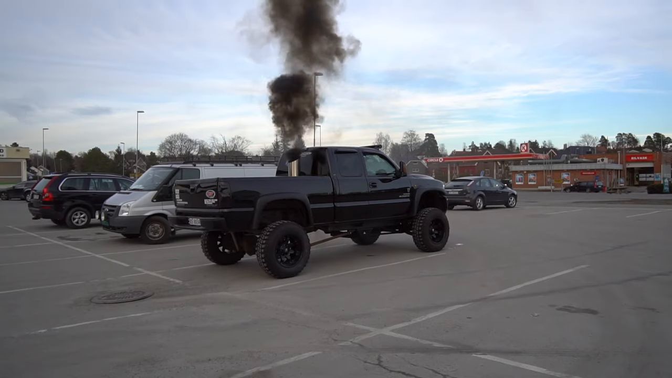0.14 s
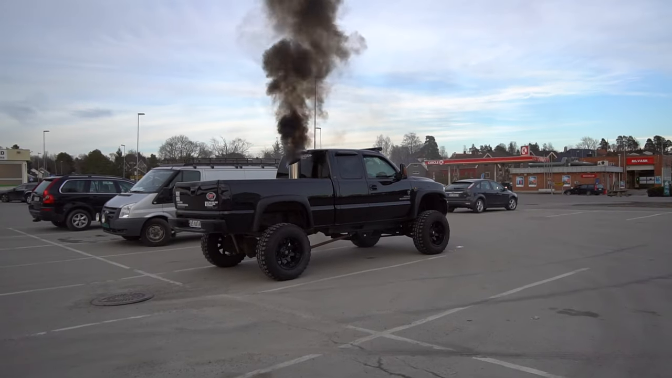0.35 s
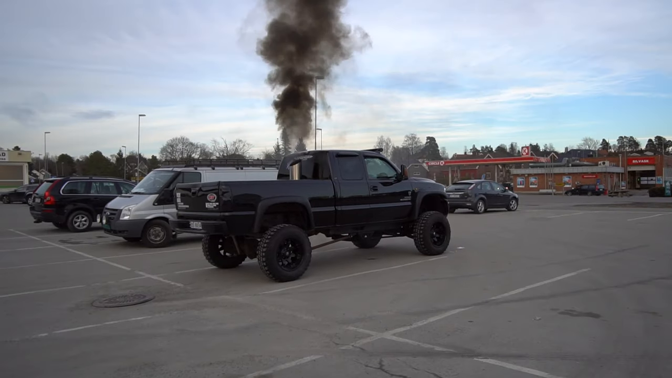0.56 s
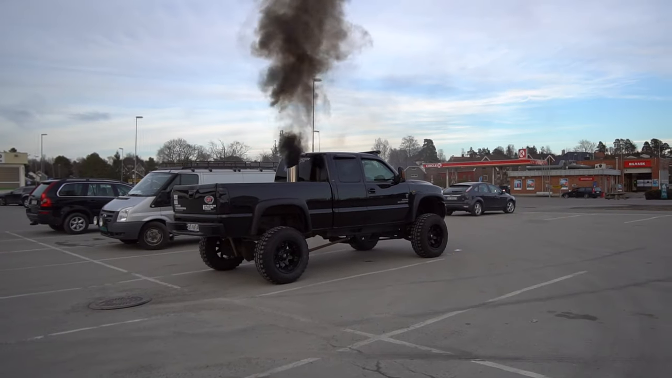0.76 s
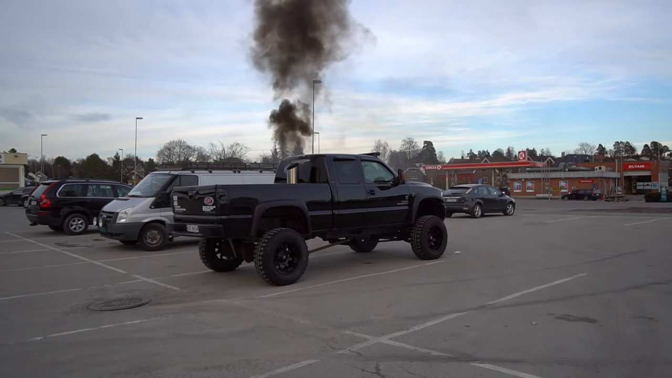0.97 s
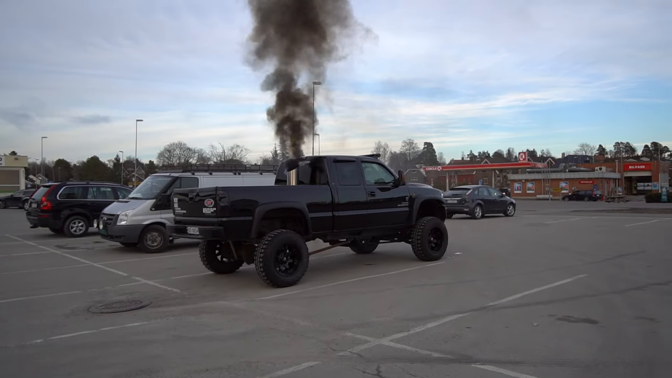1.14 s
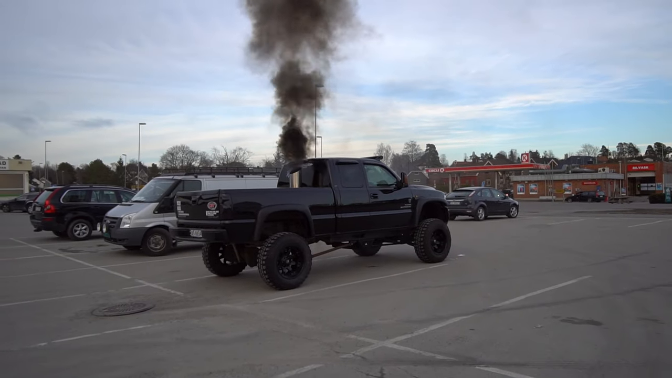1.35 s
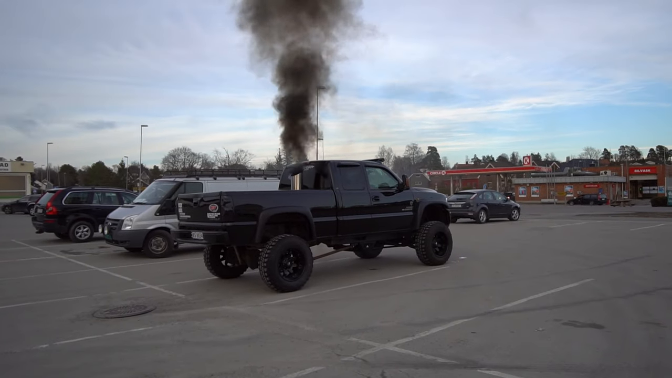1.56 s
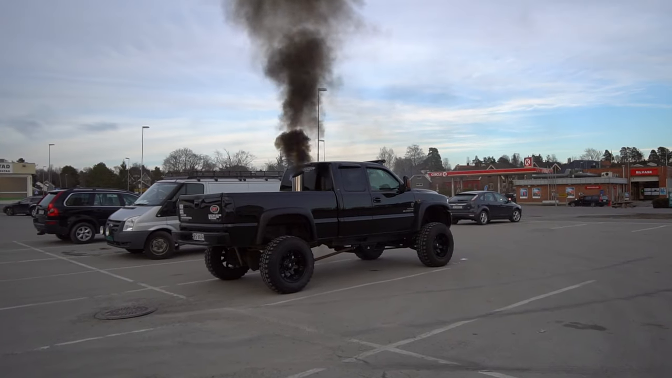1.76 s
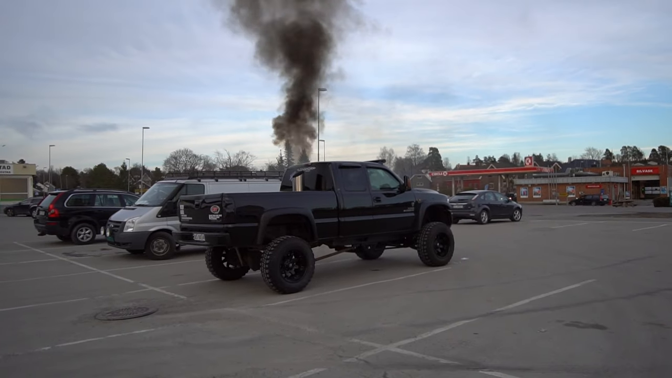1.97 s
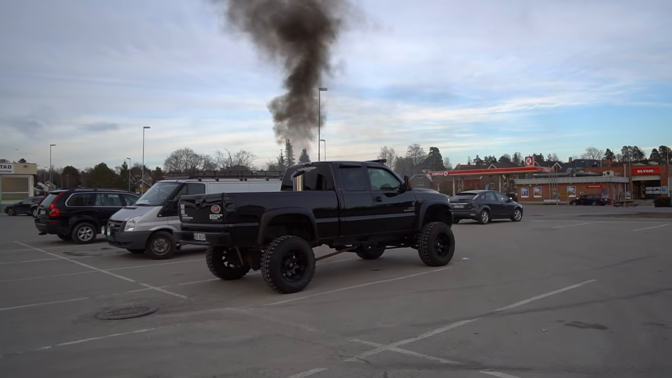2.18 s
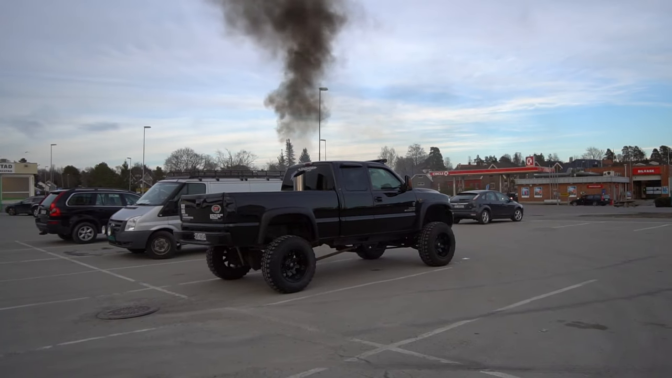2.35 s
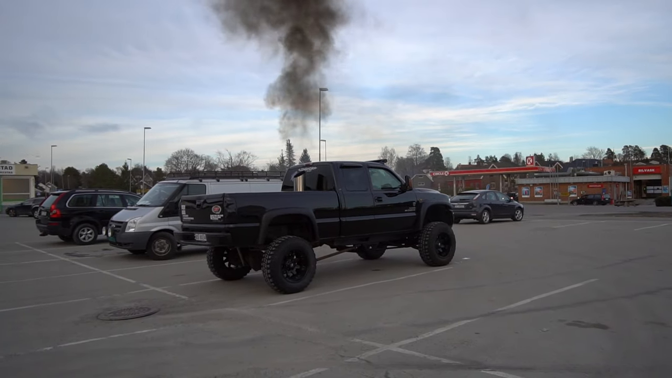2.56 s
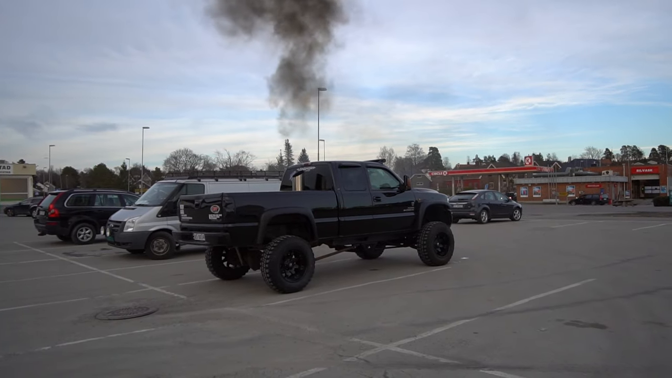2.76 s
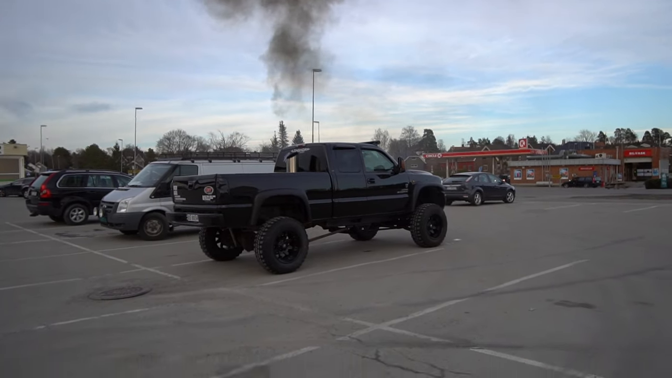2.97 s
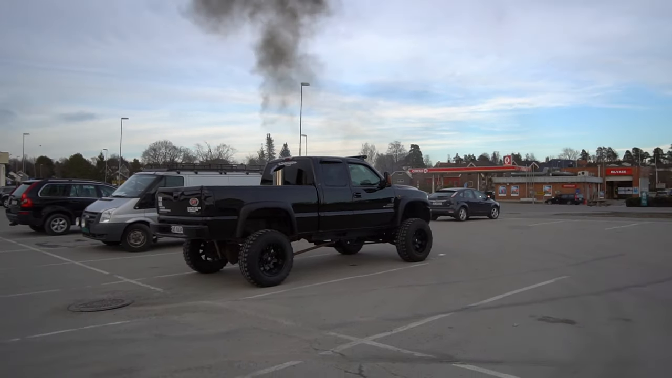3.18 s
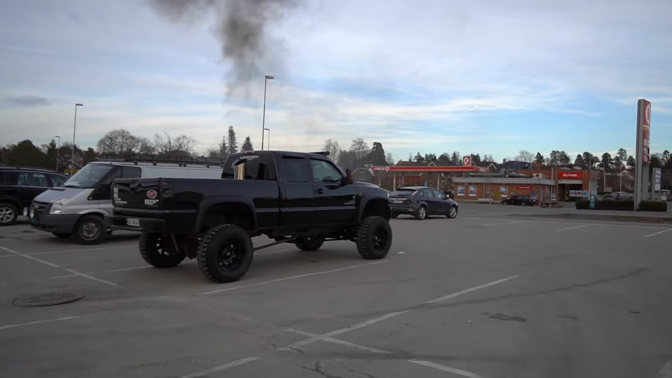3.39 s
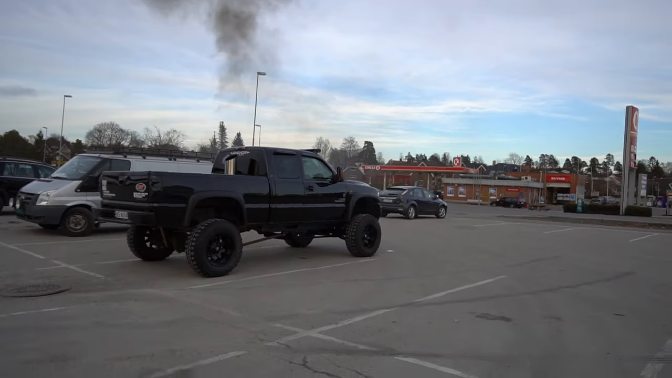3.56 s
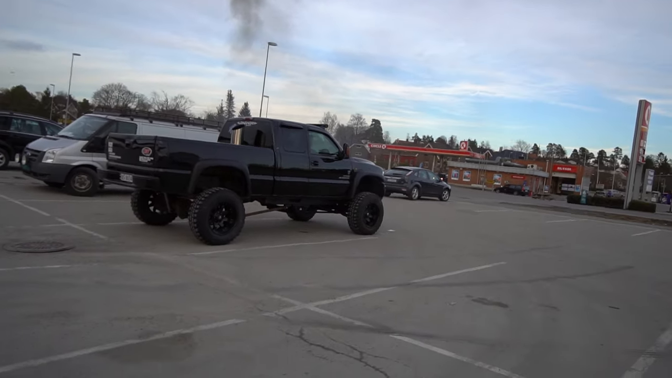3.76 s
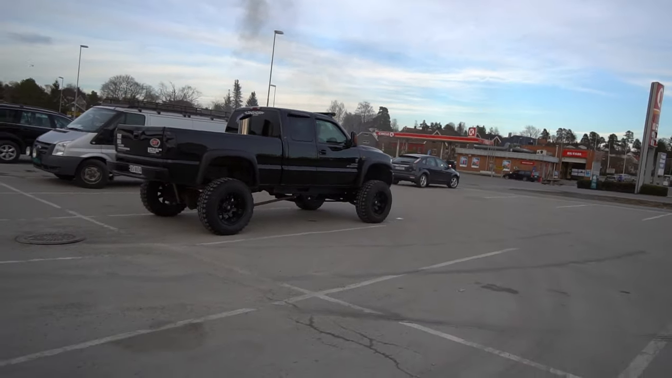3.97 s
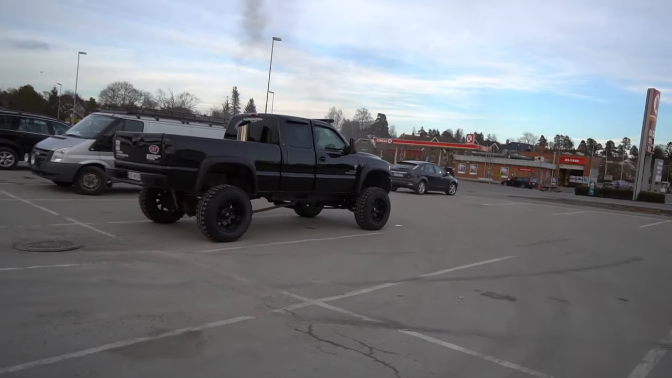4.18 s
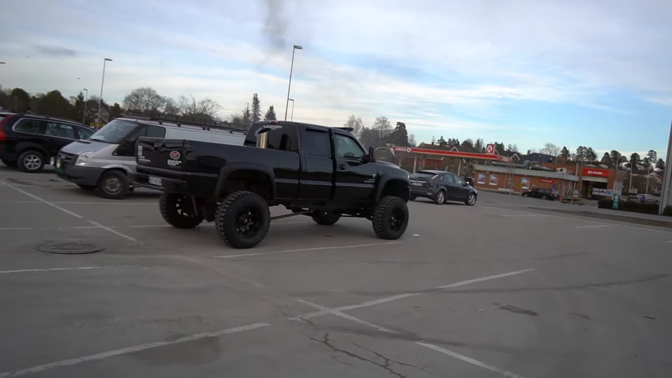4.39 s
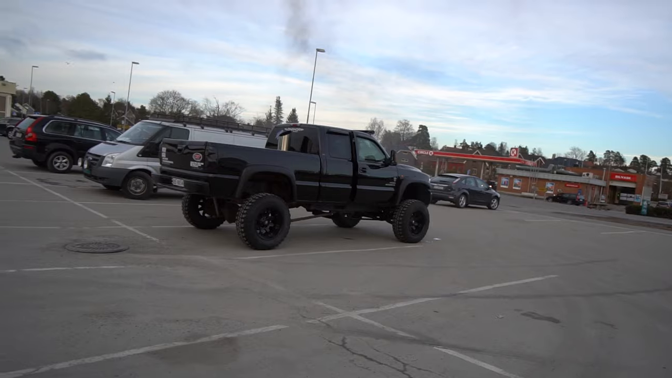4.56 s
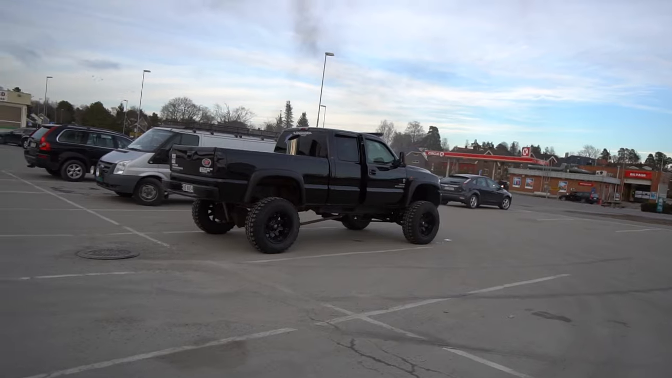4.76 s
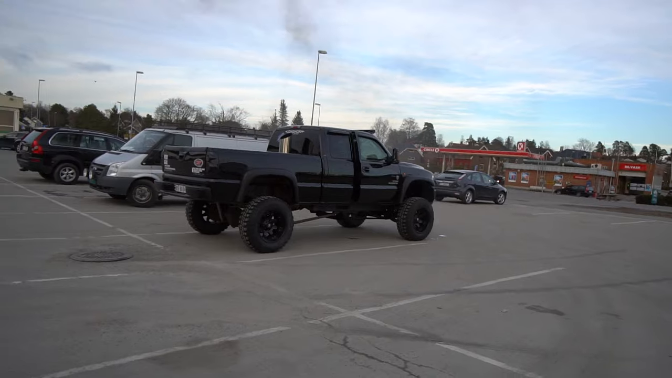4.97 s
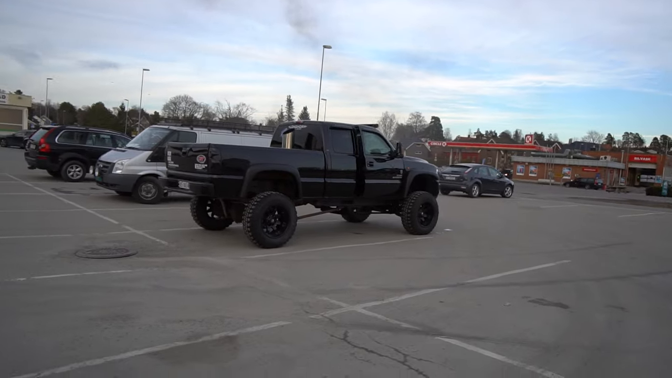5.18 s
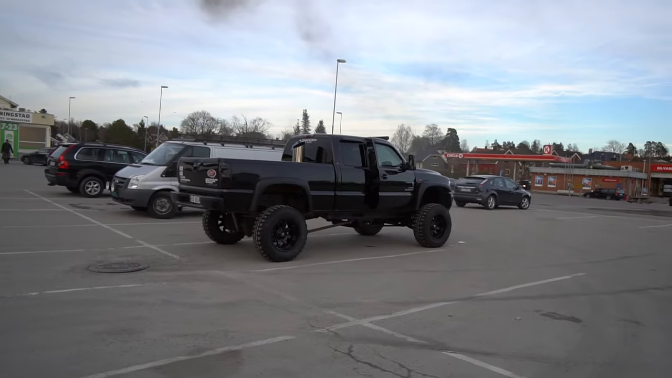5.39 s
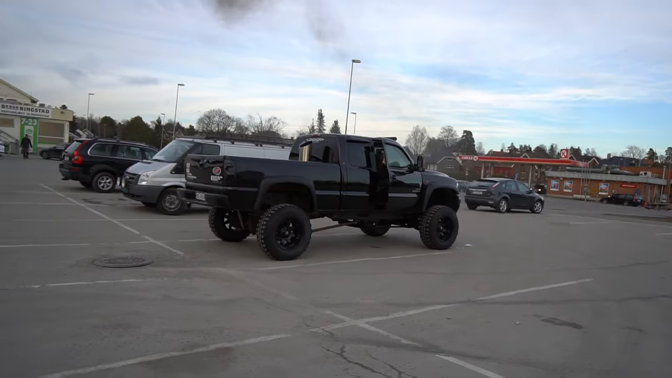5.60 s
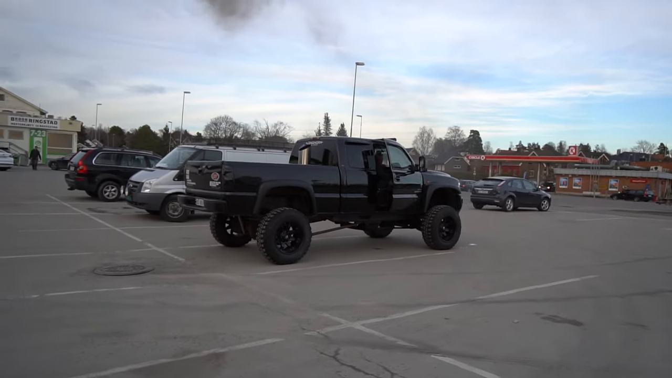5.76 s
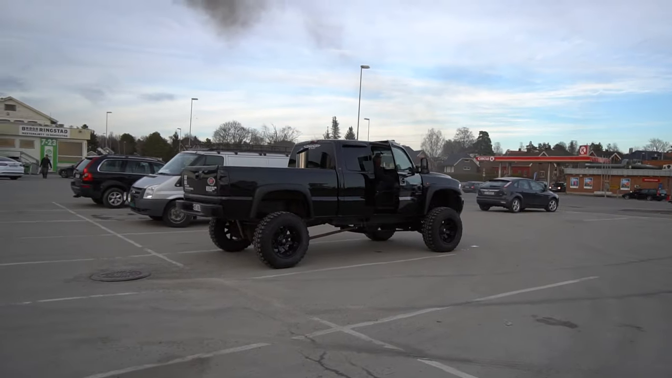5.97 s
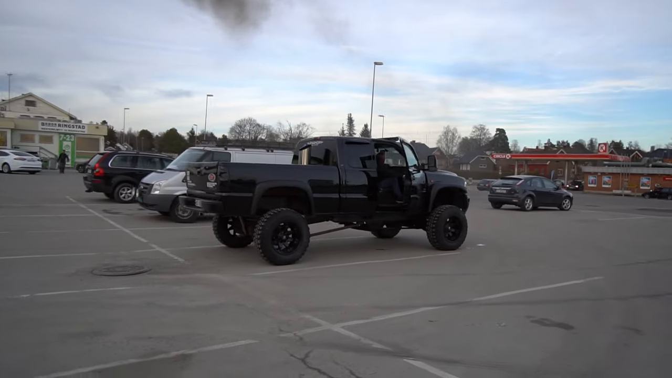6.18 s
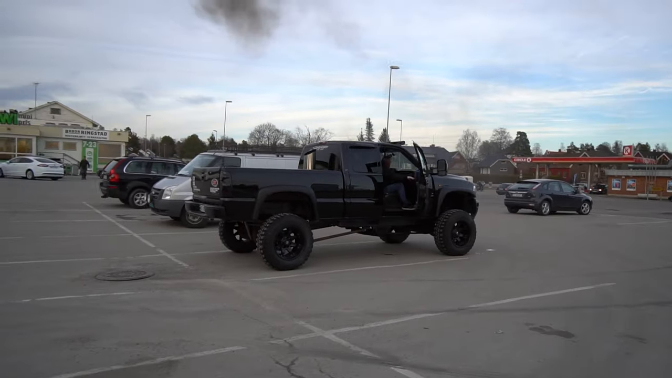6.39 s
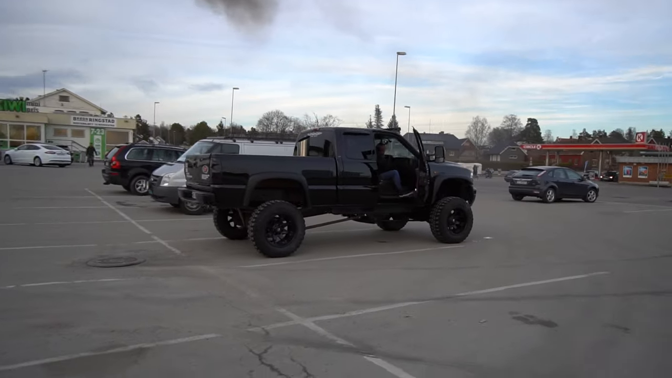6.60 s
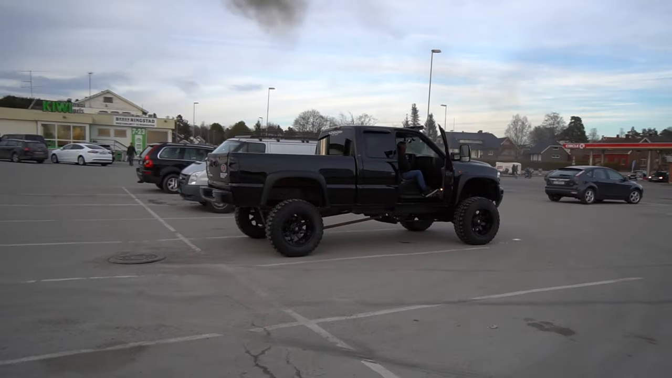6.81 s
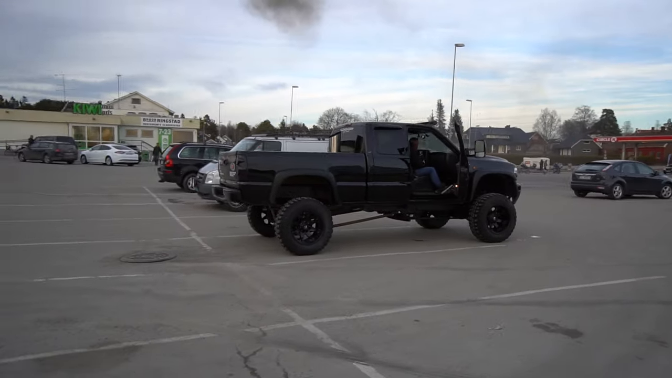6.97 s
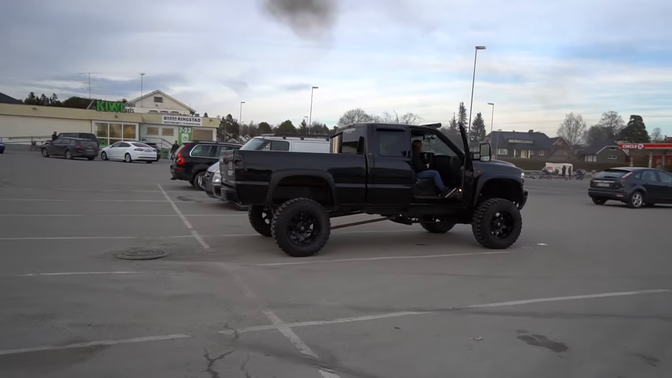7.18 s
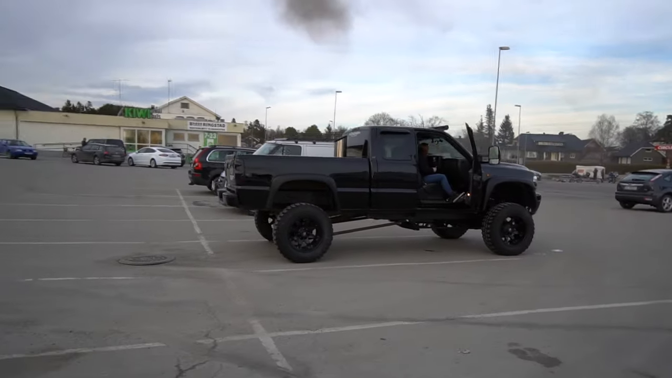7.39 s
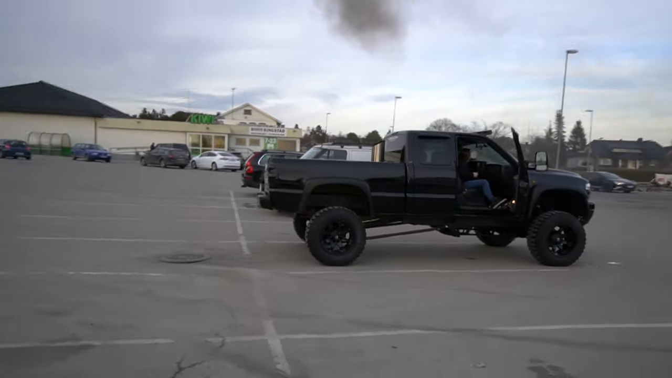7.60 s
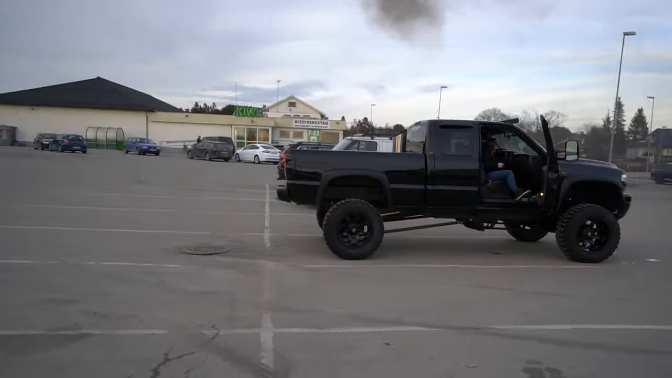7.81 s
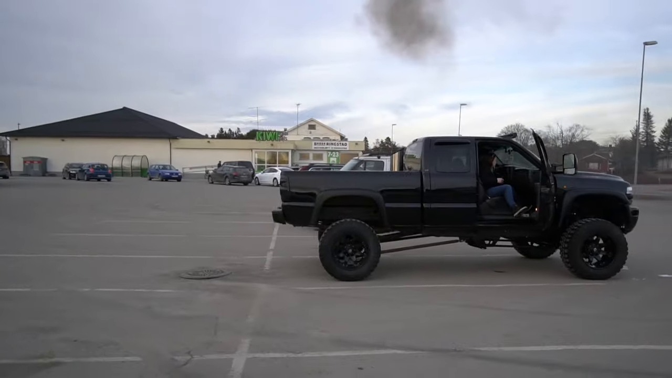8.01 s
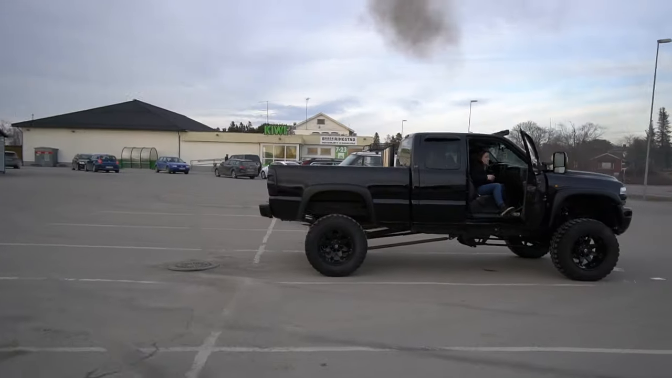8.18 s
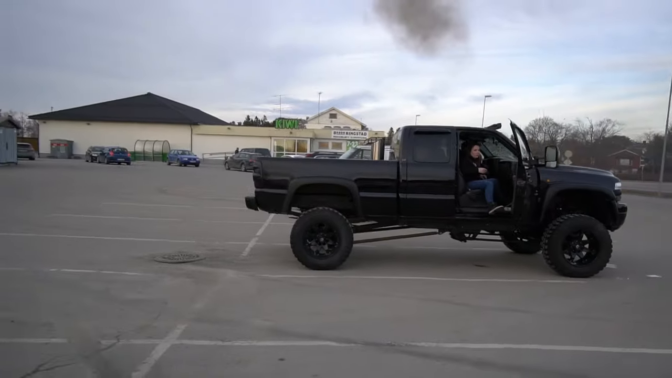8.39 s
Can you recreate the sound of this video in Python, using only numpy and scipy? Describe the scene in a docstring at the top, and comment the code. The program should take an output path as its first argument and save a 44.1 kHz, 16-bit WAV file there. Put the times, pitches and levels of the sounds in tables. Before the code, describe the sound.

A loud diesel engine already spinning down is stabbed four times, each bark raspy and almost overloading a handheld microphone whose level ducks. Pitch slides down for about two seconds with rasp, airy hiss and a faint descending whistle. Then a rhythmic idle throbs steadily, each pulse a low boom with gritty clatter and fine ticking, growing closer. Open-air car park, slight reflections off cars and walls.

```python
"""Revving diesel pickup in a car park

A V8 turbodiesel pickup with an open exhaust stack barks at four stabs of the throttle, then coasts down.
Clicks, noise and sines locked to one crankshaft make the engine; filters shape them like the stack.
The turbo is hiss with a falling whistle. Then the idle surges about three and a half times a second,
growing louder as the truck draws nearer. Thin echoes follow, and the recorder's gain ducks loud passages.
"""
import sys
import numpy as np
from scipy import signal
from scipy.fft import rfft, irfft
from scipy.io import wavfile
from scipy.ndimage import uniform_filter1d, minimum_filter1d, map_coordinates

SR = 44100
rng = np.random.default_rng(int(sys.argv[2]) if len(sys.argv) > 2 else 0)


def wrap_up_sound(samples):
    """Save the sound to the file named by the first command line argument, as 16-bit audio."""
    columns = np.atleast_2d(samples).T
    # keep every value between -1 and 1, then stretch to whole-number steps
    tamed = np.clip(columns, -1, 1)
    steps = np.round(tamed * 32767).astype(np.int16)
    wavfile.write(sys.argv[1], SR, steps)


N = 372644
TIME = np.arange(N) / SR

# Levels below are starting points: most layers get a small trim where they are mixed.
# Throttle stabs: start_s, end_s, top_speed_turns_per_s, spin_up_s, run_down_s, strength_db,
# rip_db (added in part to the strength), drone_after_db, rasp_after_db
STABS = [(0.05, 0.172, 57, .045, 2.62, -7, -7, -16, -21),
         (.592, 0.669, 52.1, 0.01614, 3.3, -9.5, -7.5, -16, -23),
         (1.033, 1.183, 56.1, .065, 2.6, -8, -7, -18.5, -22.5),
         (1.507, 1.611, 56.8, .024, 2.38, -7, -6.5, -20.5, -23.5)]
# Idle surges: crest_s, boom_db
SURGES = [(3.79, -24.5), (4.017, -18.5), (4.274, -19), (4.576, -19), (4.845, -18.5), (5.128, -18.5),
          (5.422, -16), (5.696, -18), (5.966, -19), (6.25, -15.5), (6.53, -17), (6.811, -18.5),
          (7.093, -18.5), (7.38, -14.5), (7.649, -18), (7.939, -18.5), (8.22, -19.5), (8.5, -15)]
# Exhaust tones under full fuel: multiple_of_crank_speed, level_db
LOAD_ORDERS = [(1.5, -21), (2, -19), (2.5, -24), (3, -26.5), (4, -7.5), (7, -21), (7.5, -30), (8, -4.5),
               (9, -26)]
# Weaker tones of the coasting engine: multiple_of_crank_speed, level_db (against each other)
COAST_ORDERS = [(1, -11), (1.5, 4), (2, -1.5), (2.5, -18), (3.5, -1), (4.5, -21), (5, -5), (5.5, -2),
                (6.5, -7.5), (7, -22.5), (8, -2.5), (8.5, -15), (9, -10), (12, -9.5), (14, -13)]
# Idle tones: multiple_of_crank_speed, level_db (against the boom)
IDLE_ORDERS = [(4, -11), (5, -16), (6, -12), (8, 0.5), (10, -19)]
# Resonances of the stack: centre_hz, width_hz, lift_db
STACK = [(113.2, 43, 18), (227, 22, 2), (335, 38, 7.5), (417.6, 75, 8.5), (585, 126, 6), (1020, 246, 10),
         (1502, 155, 9), (2050, 44, 0.5), (3290, 180, 1)]
# Broad colours of the noisy layers, each: frequency_hz, level_db
BARK = [(60, -28), (190, -8), (300, 1), (480, -1), (750, -11), (1050, -9), (1500, -19), (2400, -32.5),
        (4500, -29), (15000, -78)]
# Bright tearing of a stab: frequency_hz, level_db
RIP = [(400, -28), (800, -6), (1100, -3), (1700, -1), (2400, -7), (3400, -10.5), (4500, -27.5), (6000, -66),
       (15000, -86)]
# Rasp of the coasting engine: frequency_hz, level_db
RASP = [(25, -31), (45, 0.5), (90, -6.5), (200, 4), (400, 1.5), (540, -4.5), (750, -6.5), (1300, -8),
        (2000, -8.5), (3200, -12.5), (4200, -21.5), (5500, -42), (15000, -72)]
# Colour of the coasting tones, strong near 45 Hz and thin below it: frequency_hz, level_db
MOUTH = [(20, -39), (45, 6), (90, -5), (170, 3), (260, 1.5), (340, -3), (500, -5), (900, -7.5)]
# Bark at idle: frequency_hz, level_db
IDLE_BARK = [(80, -2), (160, -12), (260, 0.5), (400, 1.5), (650, -2.5), (900, -8.5), (1500, -25),
             (2500, -29), (6000, -52), (15000, -63)]
# Low rumble: frequency_hz, level_db
RUMBLE = [(20, -59), (33, -6), (46, -0.5), (70, 1.5), (90, -0.5), (135, 1), (190, -12.5), (400, -14.5),
          (2000, -82)]
# Steady exhaust flow at idle: frequency_hz, level_db
FLOW = [(25, -33.5), (45, 2.5), (70, -0.5), (105, 3.5), (155, 0.5), (230, -15.5), (400, -17), (2000, -63)]
# Combustion clatter: frequency_hz, level_db
CLATTER = [(150, 6.5), (400, -2.5), (800, -1.5), (1100, 2.5), (1400, 5), (1900, -2), (2500, -1.5),
           (3400, -7.5), (4300, -14.5), (5300, -26), (7000, -32), (9500, -40), (15000, -50)]
# Hiss of the turbo and of the idle's spit: frequency_hz, level_db
HISS = [(1500, -15), (4000, 7.5), (6300, 6), (8000, 0.5), (9800, -3), (11500, -1), (15500, -5)]
# Fine ticking at idle: frequency_hz, level_db
TICKS = [(4000, -16), (8000, -4.5), (11500, 7), (15500, 3)]
# Cylinders in firing order: strength_db
CYLINDERS = [1.5, -14.5, -8.5, -2.5, 2, 0, -3, -9.5]
# Light metal clinks: start_s, pitch_hz, level_db
CLINKS = [(3.75, 2500, -40), (3.901, 2600, -38), (6.77, 5030, -50), (7.02, 4050, -45), (8.15, 4090, -48),
          (7.552, 3834, -44), (7.552, 2561, -33)]
# Echoes off parked cars and shop fronts: delay_s, level_db
ECHOES = [(.0063, -16.5), (0.03, -14), (0.075, -31), (0.126, -23.5), (.27, -22.5)]

# Already coasting before the first stab (turns per s, dB)
FIRST_SPEED, FIRST_DRONE_DB, FIRST_RASP_DB = 48.0, -11, -18.5
PULL_LEAD_S, OVERRUN_S = 0.012, 0.025   # driven from just before a bark, held at speed just after it
DRY_FRICTION_SPEED = 23.0   # turns per s at which viscous drag equals dry friction
GUST_DB, GUST_S, GUST_EDGE_S = 4, 0.072, 0.019   # flow swells around a stab, then gives way to the bark
# Third-order drone: turns per s, and dB lost per turn per s under that; then the same for the firing note
DRONE_FADES_BELOW, DRONE_FADE_DB = 33.3, 2.5
FIRING_DB, FIRING_FADES_BELOW, FIRING_FADE_DB = -29, 21.7, 1.1
LINGER_DB, LINGER_S = -15.5, 0.06   # the firing note hangs on after a bark
# As the turbo runs down; its time constant starts once the last stab ends
TURBO_TOP_HZ, TURBO_RUN_DOWN_S = 14100, 1.86
RASP_FALL_DB_PER_S, HISS_FALL_DB_PER_S, WHISTLE_FALL_DB_PER_S = 6.5, 9, 3
TURBO_HISS_DB, HISS_DIP_DB = -22.5, 2.5   # against the gas flow; thinning under each bark
WHISTLE_DB, WHISTLE_END_S = -73, 3.7
DUCT_HZ, DUCT_WIDTH_HZ, DUCT_LIFT_DB = 6444, 550, 11   # the whistle flares as it passes this resonance
IDLE_FROM_S, IDLE_FULL_S = 3.56, 3.74
SURGE_HOLD_S = 0.007   # full fuel just ahead of each crest
CREST_SPEED, SPEED_PER_BOOM_DB = 14.4, 0.15   # turns per s; turns per s lost per dB the boom sinks
# Idle layers: dB when the idle sets in, dB gained per s as the truck draws nearer
BARK_LEVEL, CLATTER_LEVEL, SPIT_LEVEL = (-32.5, 2.34), (-45, 1.58), (-67, 2.98)
BARK_FULL_BOOM_DB, BARK_FOLLOWS = -22.5, 1   # surges booming less than this bark less, by this share
TICKS_PER_S, TICK_DB = 70, 21.5   # sharp lone ticks: average rate, lift over the fine ticking
HUM_START_S, HUM_SINKS_S, HUM_END_S, HUM_FADE_S = 7.24, 7.38, 7.59, 0.028
HUM_HZ, HUM_SAG_HZ_PER_S, HUM_DB = 225, 260, -31.5
CUTOFF_HZ = 15500


def barking(turns):
    """Under full fuel, pressure pulses bark out of the stack and steepen into a rip; low tones linger."""
    clicks = firings(turns, uneven_db=4.0, jitter_s=0.00008)
    blows = clicks + 0.7 * puffs(clicks, decay_s=0.004, steady=0.6)
    bark = colour(blows, BARK, STACK) * throttle(rise_s=0.006, fall_s=0.02)
    tearing = clicks + 1.05 * puffs(clicks, decay_s=0.006, steady=0.7)
    flicker = from_db(drift(58.5))
    rip = colour(tearing, RIP, STACK) * flicker * throttle(rise_s=0.019, fall_s=0.026, rip=0.59)
    boom = tones(turns, LOAD_ORDERS, rough=0.15) * throttle(rise_s=0.072, fall_s=0.024, late_s=0.018)
    return from_db(-2.5) * bark + from_db(-3.0) * rip + from_db(2) * boom


def coasting(speed, turns, drone_db, flow_db):
    """With the fuel cut the engine pumps air: a hollow drone and a rasp through the stack."""
    third_db = drone_db - DRONE_FADE_DB * np.maximum(DRONE_FADES_BELOW - speed, 0)
    firing = from_db(FIRING_DB - FIRING_FADE_DB * np.maximum(FIRING_FADES_BELOW - speed, 0))
    firing += from_db(LINGER_DB) * throttle(rise_s=0.034, fall_s=0.045, late_s=LINGER_S)
    drone = from_db(third_db) * tones(turns, [(3, 0)], rough=0.065)
    drone += firing * tones(turns, [(4, 0.0012)], rough=0.12)

    rasp_db = flow_db - RASP_FALL_DB_PER_S * run_down_time()
    overtones = tones(turns, COAST_ORDERS, rough=0.3)
    drone += from_db(rasp_db - 1.5) * colour(overtones, MOUTH, STACK)
    clicks = firings(turns, uneven_db=2.0, jitter_s=0.00016)
    rasp = colour(0.18 * clicks + puffs(clicks, decay_s=0.0095, steady=1.66), RASP, STACK)
    # the drone gives way while the throttle is open
    shut = np.clip(1 - 1.95 * throttle(rise_s=0.0031, fall_s=0.009), 0, 1)
    return shut * drone + from_db(rasp_db + 1.4) * rasp


def stack_drone(speed, turns, width_hz=36):
    """The fifth order swells as the slowing engine carries it through the stack's lowest resonance."""
    off_tune = 2 * (5 * speed - STACK[0][0]) / width_hz
    return tones(turns, [(5, -35)], rough=0.17) / np.sqrt(1 + off_tune ** 2)


def idling(turns, boom_swing_db):
    """Each surge swells in clatter and bark, and the stack booms at twice the firing rate."""
    crest_s, crest_boom_db = np.transpose(SURGES)
    boom_db = np.interp(TIME, crest_s, crest_boom_db)
    bark_db, clatter_db, spit_db = nearing(BARK_LEVEL), nearing(CLATTER_LEVEL), nearing(SPIT_LEVEL)
    bark_swing_db = surge_swing(attack_db_per_s=219, release_db_per_s=179, depth_db=13.5)
    bark_swing_db += BARK_FOLLOWS * np.minimum(boom_db - BARK_FULL_BOOM_DB, 0)
    clatter_swing_db = surge_swing(attack_db_per_s=47, release_db_per_s=110, depth_db=6.0)
    clicks = firings(turns, uneven_db=4.5, jitter_s=0.00038)

    booming = tones(turns, IDLE_ORDERS, rough=0.2)
    boom = from_db(boom_db + boom_swing_db + 2.7) * booming
    thuds = clicks + 0.69 * puffs(clicks, decay_s=0.0067, steady=0.85)
    rumble = from_db(boom_db + 0.35 * boom_swing_db - 12.0) * colour(thuds, RUMBLE, STACK)
    flow = from_db(bark_db - 3.5) * colour(rng.standard_normal(N), FLOW)

    # gas leaves on each outward swing of the boom
    jet = (np.maximum(booming, 0) + 0.76) * rng.standard_normal(N)
    bark_source = 0.21 * clicks + rms_one(jet)
    bark = from_db(bark_db + bark_swing_db + 0.5) * colour(bark_source, IDLE_BARK, STACK)

    clatter_gain = from_db(clatter_db + clatter_swing_db + 9.0 + 0.51 * drift(45))
    clatter = clatter_gain * colour(puffs(clicks, decay_s=0.021, steady=1.03), CLATTER)
    spit_gain = from_db(spit_db + 0.4 * clatter_swing_db - 0.4)
    spit = spit_gain * colour(puffs(clicks, decay_s=0.017, steady=1.1), HISS)

    grain_db = 4 * np.clip(drift(90), -2, 2.5) + 3 * np.clip(drift(700), -2, 2.5)
    grains = from_db(grain_db) * rng.standard_normal(N)
    lone_ticks = (rng.random(N) < TICKS_PER_S / SR) * rng.uniform(-2, 2, N)
    grains += from_db(TICK_DB) * lone_ticks
    ticking = from_db(spit_db + 0.5 * clatter_swing_db - 9.0) * colour(grains, TICKS)
    return boom + rumble + flow + bark + clatter + spit + ticking


def turbo(revving, flow_db):
    """Air rushes through the spinning turbo; its blades whistle lower, fitfully, as it runs down."""
    since = run_down_time()
    hz = TURBO_TOP_HZ * np.exp(-since / TURBO_RUN_DOWN_S)
    duct_db = DUCT_LIFT_DB / (1 + (2 * (hz - DUCT_HZ) / DUCT_WIDTH_HZ) ** 2)
    whistle_db = WHISTLE_DB - WHISTLE_FALL_DB_PER_S * since + duct_db
    phase = 2 * np.pi * np.cumsum(hz) / SR
    whistle = drift(110) * np.sin(phase) + drift(110) * np.cos(phase)
    audible = np.clip(np.minimum(since, WHISTLE_END_S - TIME) / 0.2, 0, 1)

    dip_db = HISS_DIP_DB * np.clip(2 * throttle(rise_s=0.02, fall_s=0.012, late_s=0.012), 0, 1)
    hiss_db = flow_db + TURBO_HISS_DB - dip_db - HISS_FALL_DB_PER_S * since + 0.5 * drift(64)
    hiss = from_db(hiss_db) * colour(rng.standard_normal(N), HISS)
    return revving * hiss + audible * from_db(whistle_db + 3.5 * drift(14)) * whistle


def small_sounds(clink_decay_s=0.012, clink_width_hz=700):
    """A faint hum that holds, then sinks; and short clinks, each noise rung twice through a narrow filter."""
    hz = HUM_HZ - HUM_SAG_HZ_PER_S * np.maximum(TIME - HUM_SINKS_S, 0)
    sounding = np.clip(np.minimum(TIME - HUM_START_S, HUM_END_S - TIME) / HUM_FADE_S, 0, 1)
    out = from_db(HUM_DB) * sounding * np.sin(2 * np.pi * np.cumsum(hz) / SR)
    for start, pitch, db in CLINKS:
        peak = signal.iirpeak(pitch, pitch / clink_width_hz, fs=SR)
        once = signal.lfilter(*peak, rng.standard_normal(N))
        ring = rms_one(signal.lfilter(*peak, once))
        decay = (TIME > start) * np.exp(-np.abs(TIME - start) / clink_decay_s)
        out = out + from_db(db) * ring * decay
    return out


def car_park(x, echo_low_hz=480, echo_cut_hz=3500):
    """A few thin, dull echoes in the open air: delayed, band-limited copies."""
    band = signal.butter(2, [echo_low_hz, echo_cut_hz], "band", fs=SR, output="sos")
    dull = signal.sosfilt(band, x)
    return x + sum(from_db(db) * np.interp(TIME - delay, TIME, dull, left=0) for delay, db in ECHOES)


def background_rumble():
    """Steady low noise under everything."""
    return from_db(-35) * colour(rng.standard_normal(N), RUMBLE)


def revving_speed():
    """Turns per second: each stab pulls the crank up to its top speed, then friction runs it down."""
    def coast(top, since_s, run_down_s):
        decay = np.exp(-np.maximum(TIME - since_s, 0) / run_down_s)
        return (top + DRY_FRICTION_SPEED) * decay - DRY_FRICTION_SPEED

    speed = coast(FIRST_SPEED, 0, STABS[0][4])
    for start, end, top, spin_up_s, run_down_s, *_ in STABS:
        driven_s = np.clip(TIME - start + PULL_LEAD_S, 0, end - start + PULL_LEAD_S)
        pull = 1 - np.exp(-driven_s / spin_up_s)
        speed = speed + pull / pull[-1] * (coast(top, end + OVERRUN_S, run_down_s) - speed)
    return speed


def throttle(rise_s, fall_s, rip=0, late_s=0):
    """Each stab opens quickly and dies away after the pedal lifts; a higher rip share opens later."""
    t = TIME - late_s
    total = 0
    for start, end, _, _, _, db, rip_db, _, _ in STABS:
        opening = np.clip((t - start) / rise_s + (1 - rip) / 2, 0, 1)
        closing = np.exp(-np.maximum(t - end, 0) / fall_s)
        total = total + from_db(db + rip * rip_db) * opening * closing
    return total


def after_stabs():
    """Drone and gas flow levels (dB) left by each stab; the flow swells just before and just after it."""
    starts, ends, *_, drone_db, rasp_db = np.transpose(STABS)
    latest = np.searchsorted(starts, TIME)   # 0 means before the first stab
    outside_each = [np.maximum(start - TIME, TIME - end) for start, end in zip(starts, ends)]
    outside_s = np.min(outside_each, axis=0)   # negative inside a stab
    gust = np.exp(-np.maximum(outside_s, 0) / GUST_S) * np.clip(1 + outside_s / GUST_EDGE_S, 0, 1)
    flow_db = np.r_[FIRST_RASP_DB, rasp_db][latest] + GUST_DB * gust
    return np.r_[FIRST_DRONE_DB, drone_db][latest], flow_db


def run_down_time():
    """Seconds since the last stab ended."""
    return np.maximum(TIME - STABS[-1][1], 0)


def surge_swing(attack_db_per_s, release_db_per_s, depth_db):
    """The governor overshoots again and again: dB under the crest, climbing to each and sinking after it."""
    crests = np.r_[0, np.array(SURGES)[:, 0], 2 * TIME[-1]]
    coming = np.searchsorted(crests, TIME, side="right")
    until = np.maximum(crests[coming] - TIME - SURGE_HOLD_S, 0)
    since = TIME - crests[coming - 1]
    below_db = np.minimum(attack_db_per_s * until, release_db_per_s * since)
    return -np.minimum(below_db, depth_db)


def nearing(level):
    """Level (dB) of an idle layer, growing as the truck draws nearer."""
    db, db_per_s = level
    return db + db_per_s * (TIME - IDLE_FULL_S)


def firings(turns, uneven_db, jitter_s, count=4):
    """One click per firing, four to a turn, each cylinder with its own strength; even power at any speed."""
    at = np.flatnonzero(np.diff(np.floor(turns * count)))
    chance = rng.standard_normal((2048, 2))[:len(at)]
    strength_db = np.resize(CYLINDERS, len(at)) + uneven_db * chance[:, 0]
    # wider gaps get stronger clicks, which keeps the power even
    sizes = from_db(strength_db) * np.sqrt(np.gradient(at))
    shift = (jitter_s * SR * chance[:, 1]).astype(int)
    clicks = np.zeros(N)
    clicks[np.clip(at + shift, 0, N - 1)] = sizes
    return rms_one(clicks)


def puffs(clicks, decay_s, steady):
    """Turbulence that flares at each firing, over a steady flow."""
    return rms_one((rms_one(lag(clicks, decay_s)) + steady) * rng.standard_normal(N))


def tones(turns, orders, rough):
    """Sines locked to the crankshaft, each fluttering in strength."""
    total = 0
    for multiple, db in orders:
        flutter = 1 + rough * drift(30)
        wave = np.sin(2 * np.pi * (multiple * turns + rng.random()))
        total = total + np.sqrt(2) * from_db(db) * flutter * wave
    return total


def colour(x, spectrum, resonances=(), size=8192):
    """Filter from a broad spectrum and resonance peaks, with no sound ahead of its cause; rms 1."""
    hz = np.maximum(np.fft.rfftfreq(size, 1 / SR), 1)
    points = np.array(spectrum)
    db = np.interp(np.log(hz), np.log(points[:, 0]), points[:, 1])
    for centre, width, lift in resonances:
        db = db + lift / (1 + (2 * (hz - centre) / width) ** 2)
    # folding the cepstrum gives the minimum-phase filter with this spectrum
    cepstrum = irfft(np.log(from_db(db)))[:size // 2]
    cepstrum[1:] *= 2
    response = irfft(np.exp(rfft(cepstrum, size)))
    return rms_one(signal.fftconvolve(x, response)[:N])


def drift(rate):
    """Smooth chance with rms 1 that takes rate new values a second."""
    knots = rng.standard_normal(4096)
    return rms_one(map_coordinates(knots, [TIME * rate], order=2, mode="wrap"))


def lag(x, seconds):
    """One-pole smoothing."""
    r = np.exp(-1 / (seconds * SR))
    return signal.lfilter([1 - r], [1, -r], x)


def rms_one(x):
    """Scale to rms 1."""
    return x / np.sqrt(np.mean(x ** 2) + 1e-20)


def from_db(db):
    """Decibels to gain."""
    return 10 ** (np.asarray(db) / 20)


def scene():
    """One crankshaft, never quite steady, drives the engine layers, first revving and then idling."""
    idle = np.clip((TIME - IDLE_FROM_S) / (IDLE_FULL_S - IDLE_FROM_S), 0, 1)
    revving = np.sqrt(1 - idle)
    boom_swing_db = surge_swing(attack_db_per_s=250, release_db_per_s=155, depth_db=19.5)
    idle_speed = CREST_SPEED + SPEED_PER_BOOM_DB * boom_swing_db
    steady_speed = (1 - idle) * revving_speed() + idle * idle_speed
    speed = steady_speed * (1 + 0.00593 * drift(70))
    turns = np.cumsum(speed) / SR

    drone_db, flow_db = after_stabs()
    truck = barking(turns)
    truck += revving * (coasting(speed, turns, drone_db, flow_db) + stack_drone(speed, turns))
    truck += np.sqrt(idle) * idling(turns, boom_swing_db)
    truck += turbo(revving, flow_db)
    return (car_park(truck + small_sounds()) + background_rumble())[None]


def record(dry, limit_db=-9, excess_fall_db_per_s=150):
    """Gain control ducks loud passages, a fast limiter catches peaks that slip past, the top is cut."""
    level_db = 10 * np.log10(lag(dry[0] ** 2, seconds=0.0058) + 1e-12)
    # the excess over the limit jumps up at once and falls back at a fixed rate
    fall = excess_fall_db_per_s * TIME
    excess_db = np.maximum.accumulate(np.maximum(level_db - limit_db, 0) + fall) - fall
    held = dry * from_db(-1.25 * lag(excess_db, seconds=0.009))
    headroom = minimum_filter1d(1 / np.maximum(np.abs(held), 1), size=91)
    limited = held * uniform_filter1d(uniform_filter1d(headroom, size=45), size=45)
    fade = np.clip(np.minimum(TIME, TIME[-1] - TIME) / 0.002, 0, 1)
    top_cut = signal.ellip(12, 0.1, 90, CUTOFF_HZ, fs=SR, output="sos")
    return signal.sosfilt(top_cut, limited * fade)


dry = scene()
out = record(dry)
wrap_up_sound(out)
```